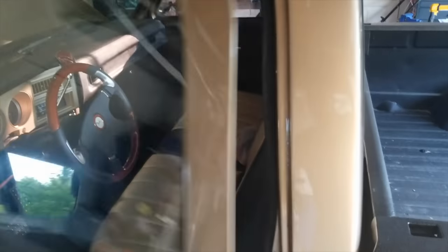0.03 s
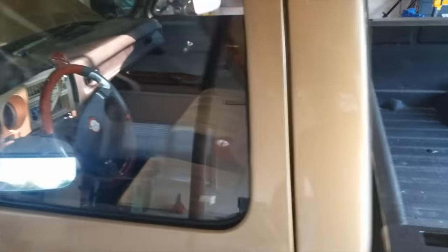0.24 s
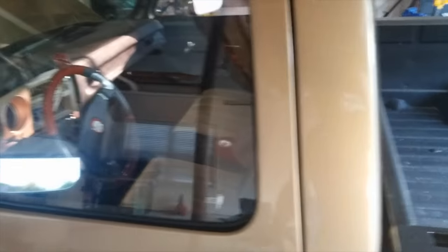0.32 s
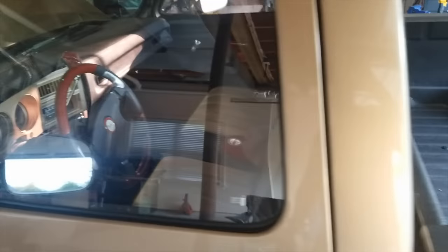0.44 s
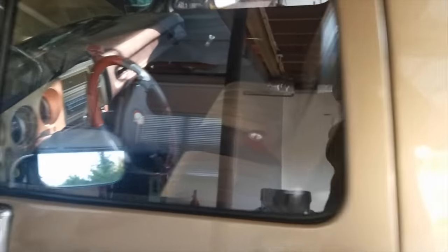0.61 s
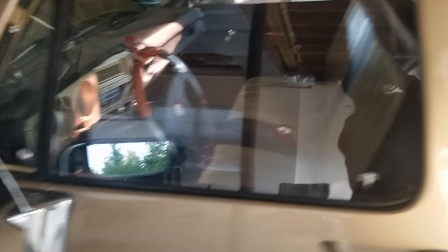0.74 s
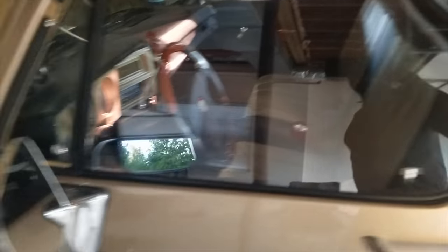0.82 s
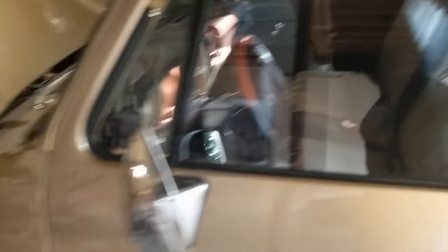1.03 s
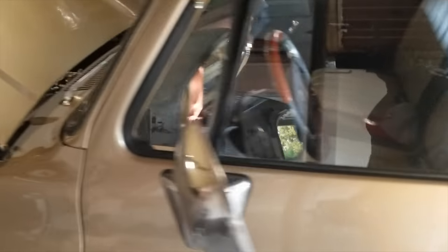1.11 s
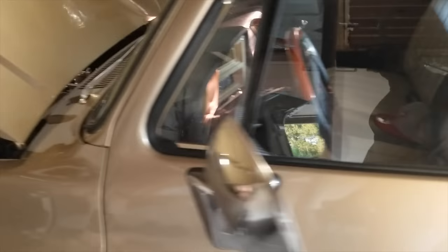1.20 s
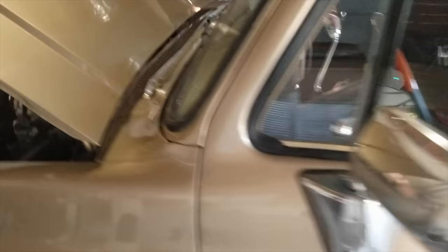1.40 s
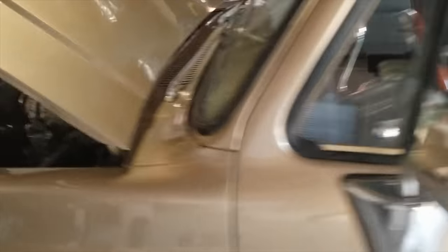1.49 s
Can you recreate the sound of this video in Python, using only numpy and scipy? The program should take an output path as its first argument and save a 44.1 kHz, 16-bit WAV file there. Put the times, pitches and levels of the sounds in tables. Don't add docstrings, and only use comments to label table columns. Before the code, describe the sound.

A pickup truck door slams shut once, close by, with a metallic latch clack and rattling glass.

```python
import sys
import numpy as np
from scipy import signal
from scipy.fft import rfft, irfft, next_fast_len
from scipy.io import wavfile
from scipy.ndimage import map_coordinates

SR = 44100
rng = np.random.default_rng(int(sys.argv[2]) if len(sys.argv) > 2 else 0)


def linear_from_db(decibels):
    return 10 ** (np.asarray(decibels, float) / 20)


def digitize_waveform(pressure):
    field = np.atleast_2d(pressure).T
    bounded = np.clip(field, -1, 1)
    quanta = np.round(bounded * 32767).astype(np.int16)
    wavfile.write(sys.argv[1], SR, quanta)


N = 68355
T = np.arange(N) / SR

# start_s, level_db, right_over_left_db
LATCH_KNOCKS = [(0.1953, -29.5, 12.5), (0.2053, -26, 2), (0.2158, -16, -1.5), (0.2248, -17, 7),
                (0.2261, -1.5, 9), (0.2286, -11, 5), (0.2312, -12.5, 7.5), (0.236, -12.5, 1.5),
                (.2420, -14.5, 3), (0.2456, -12, 2.5), (0.2497, -14, 3), (.2530, -13.5, 5),
                (0.259, -32.5, -5), (0.263, -17, 4), (0.289, -23.5, 1.5), (.3000, -25, 1.5),
                (0.313, -27.5, -2), (0.333, -43, 4)]
# pitch_hz, level_db, t60_s
LATCH_MODES = [(752, -12, 0.046), (955, 0.5, 0.019), (1126, 3.5, 0.022), (1221, 2, 0.016),
               (1310, 2.5, 0.013), (1472, -9, 0.071), (1720, 3.5, 0.018), (1884, -10, 0.04),
               (2167, -9, .02)]
# start_s, level_db, t60_s, right_over_left_db
TRIM_RATTLES = [(0.194, -38, 0.9, 2), (0.227, -29, .06, 13), (0.23, -19.5, 0.2, -4.5),
                (0.249, -21, 0.11, 2), (0.261, -21, 0.11, 0.5), (0.28, -25.5, 0.24, 0),
                (.2960, -23.5, 0.15, -4), (0.31, -42, 0.083, -3.5), (0.344, -46, 0.16, 0),
                (0.399, -56, 0.76, -2.5), (0.533, -51, 0.027, 0)]
# freq_hz, level_db_per_hz
TRIM_SPECTRUM = [(240, -41), (400, -8), (949, -2), (2250, -6), (4110, -9.5), (4950, -11), (7060, -12.5),
                 (12500, -16.5), (16000, -14.5)]
# start_s, level_db, t60_s, right_over_left_db
GLASS_SHAKES = [(0.1941, -33, 0.037, -1), (0.217, -62, 0.025, 3), (0.2315, -25, 0.03, 13),
                (0.2444, -17.5, .06, 12.5), (.2497, -19, 0.038, 1), (0.27, -19.5, 0.13, 5),
                (0.2809, -22.5, 0.086, 3), (0.488, -59.5, 0.027, 3.5), (0.509, -50.5, 0.0265, 2.5),
                (0.534, -62, 0.02, -0.5), (.588, -62, 0.012, 0)]
# freq_hz, level_db_per_hz
GLASS_SPECTRUM = [(2500, -30), (5000, -14), (7500, 0), (12500, -9), (16000, -2)]
# start_s, level_db, pitch_hz, t60_s
CAB_PUSHES = [(0.197, -31, 383, 0.098), (0.214, -26.5, 250.3, 0.18), (.243, -19, 1150, .07),
              (.248, -17.5, 44.94, 0.14), (.249, -19, 1090, .07), (.2800, -22.5, 148.8, 0.28),
              (0.2807, -22, 255, 0.1), (.283, -22, 97.8, 0.42), (0.288, -14, 50.2, 0.21),
              (.295, -26.5, 554.5, 0.15), (.296, -27.5, 1106, 0.16), (.3, -31, 797, 0.15),
              (0.311, -27, 1180, 0.095), (.325, -31.5, 699, 0.13), (0.305, -22.5, 210.8, 0.19),
              (.308, -29.5, 330, 0.12), (0.367, -26, 57.3, 0.3), (.34, -33, 344.5, .25),
              (0.386, -32, 256.6, 0.094), (.42, -39, 279.2, 0.12), (.395, -35.5, 148.3, .2),
              (0.407, -35, 94, 0.18), (0.518, -35, 102, 0.24)]
# start_s, level_db, rise_s, t60_s
SKIN_SHUDDERS = [
    (0.092, -37.5, 0.0014, 0.37),
    (0.192, -28, 0.0037, 0.25),
    (0.224, -32.5, .003, 0.3),
    (.28, -25.5, 0.005, 0.35),
    (0.318, -35, 0.0091, 0.4),
    (0.469, -40, 0.015, 0.2),
]
# freq_hz, level_db_per_hz
SKIN_SPECTRUM = [(40, -30.5), (90, -12.5), (150, -6.5), (260, -3.5), (380, -4.5), (550, -8.5), (800, -9),
                 (1300, -42.5)]
# freq_hz, t60_s
WALL_DECAY = [(100, .7), (500, .55), (1200, .52), (4000, .48), (9000, .33), (15000, .22)]
# start_s, level_db, rise_s, t60_s, right_over_left_db
SHOE_SCUFFS = [
    (0.0944, -48, 0.00056, 0.13, 4.5),
    (.11, -59, 0.0094, .25, 6),
    (1.352, -52, 0.042, 0.45, 2.5),
    (1.469, -56, 0.0031, 0.34, 3.5),
    (1.512, -56.5, 0.0052, 0.29, -1),
]
# freq_hz, level_db_per_hz
SOLE_SPECTRUM = [(400, -18.5), (700, -14.5), (1800, -2.5), (3000, -7.5), (6000, -16.5), (9500, -8.5),
                 (12500, -11), (16000, -23)]
# start_s, level_db, centre_hz, t60_s
DULL_TAPS = [(.532, -54, 1200, .08), (.58, -62, 1900, .1), (.845, -57, 2450, .05), (1.011, -63, 1350, .08),
             (1.012, -65, 1950, .08), (1.39, -61, 1900, .2), (1.511, -50, 1500, .03),
             (1.521, -55, 1600, .1), (1.525, -66, 5200, .15)]
# start_s, level_db, lowest_hz, left_over_right_db
GRIT_TICKS = [
    (1.4674, -28, 9000, 5),
    (1.4686, -38, 6000, 5),
    (1.5073, -31, 5000, 3),
]
# (pitch_hz, level_db, t60_s)
RINGING_STONES = [
    (1.4674, -38, [(6640, -6, .008), (8130, -1, .009), (11100, 0, .005), (12500, -3, .004), (14200, -7, .004)]),
    (1.5073, -40, [(2250, -2, .009), (2640, -4, .006), (3900, -2, .007), (6800, 1, .005), (7970, 1, .005), (13500, -6, .004)]),
]
# freq_hz, level_db_per_hz
TRAFFIC_SPECTRUM = [(15, -66.5), (25, -19.5), (124, -1), (164, -6.5), (386, -14.5), (433, -19),
                    (469, -20.5), (827, -30), (1200, -56), (1560, -65), (2640, -120)]
# freq_hz, level_db_per_hz
AIR_SPECTRUM = [(500, -30), (900, 0), (1800, -6), (2800, -15), (4300, -23), (6300, -22), (8000, -18),
                (10400, -45)]
# freq_hz, level_db_per_hz
INSECT_SPECTRUM = [(8000, -19), (8600, -12), (9100, -8.5), (9500, -3), (9800, -6.5), (10100, -15.5),
                   (10500, -30)]
# freq_hz, level_db_per_hz
HISS_SPECTRUM = [(6500, -36), (8500, -2), (16000, 1.5)]
# freq_hz, likeness (-1 to 1)
YARD_ALIKE = [(60, 0.91), (180, 0.94), (550, 0.0027), (1650, 0.62), (4970, -0.02), (15000, -0.92)]
# time_s, gain_db
RECORDER_GAIN = [(0, 12), (0.202, 11.5), (.23, 20), (0.501, 5.5), (.7, 4), (1.101, 2.5), (1.351, 3.5),
                 (1.55, 8.5)]
# freq_hz, likeness (-1 to 1)
SKIN_ALIKE = [(60, 1.0), (250, 0.99), (900, 0.38)]
TRIM_ALIKE = [(500, 0.94), (3000, 0.081), (12000, 0.3)]
SOLE_ALIKE = [(800, 0.53), (5000, 0.17)]
GLASS_ALIKE, TAP_ALIKE = [(8000, 0.35)], [(900, 0.7)]
INSECT_ALIKE, HISS_ALIKE = [(9000, 0.062)], [(9000, 0.0024)]


def unit(x):
    return x / np.sqrt(np.mean(x ** 2) + 1e-20)


def along(points, hz):
    f, v = np.transpose(points)
    return np.interp(np.log(hz + 1), np.log(f + 1), v)


def filtered(x, response):
    m = next_fast_len(N + SR // 2)
    return irfft(rfft(x, m) * response(np.fft.rfftfreq(m, 1 / SR)), m)[..., :N]


def wobble(rate_hz):
    return map_coordinates(rng.standard_normal(200), [T * rate_hz])


def rush(spectrum, alike):
    def response(hz):
        angle = np.arccos(np.clip(along(alike, hz), -1, 1)) / 2
        return linear_from_db(along(spectrum, hz)) * [np.cos(angle), np.sin(angle)]

    mid, side = filtered(rng.standard_normal((2, N)), response)
    return unit(np.array([mid + side, mid - side]))


def burst(start_s, rise_s, t60_s):
    t = np.maximum(T - start_s, 0)
    return (1 - np.exp(-t / max(rise_s, 1e-5))) * linear_from_db(-60 * t / max(t60_s, 1e-3))


def sides(right_db):
    return linear_from_db([[-right_db / 2], [right_db / 2]])


def ring(start_s, modes, rise_s, scatter_db, turn):
    hz, db, t60_s = np.transpose(modes)[:, :, None]
    first = int(start_s * SR)
    t = np.maximum(T - start_s, 0)[first:int((start_s + 0.5) * SR)]
    level_luck, phase_luck = rng.standard_normal((2, len(modes), 1))
    decay = linear_from_db(db + scatter_db * level_luck - 60 * t / t60_s)
    out = np.zeros((2, N))
    for side in (0, 1):
        phase = turn * (2 * side - 1) * phase_luck * np.clip(hz / 1200, 0, 1)
        wave = decay * np.sin(2 * np.pi * hz * t + phase)
        out[side, first:first + len(t)] = wave.sum(0) * (1 - np.exp(-t / rise_s))
    return out


def latch():
    out = np.zeros((2, N))
    for s, db, right in LATCH_KNOCKS:
        knock = ring(s, LATCH_MODES, rise_s=0.0016, scatter_db=2.5, turn=0.1)
        out += linear_from_db(db - 4.5) * sides(right) * knock
    return out


def rattle():
    trim = sum(linear_from_db(db) * sides(right) * burst(s, 0.001, t60) for s, db, t60, right in TRIM_RATTLES)
    glass = sum(linear_from_db(db) * sides(right) * burst(s, 0.0005, t60) for s, db, t60, right in GLASS_SHAKES)
    clumps = linear_from_db(2.5 * map_coordinates(rng.standard_normal(N // 40 + 4), [np.arange(N) / 40]))
    trim = trim * rush(TRIM_SPECTRUM, TRIM_ALIKE)
    glass = glass * rush(GLASS_SPECTRUM, GLASS_ALIKE)
    return clumps * (trim + glass)


def cab():
    boom = np.zeros((2, N))
    for s, db, hz, t60 in CAB_PUSHES:
        boom -= ring(s, [(hz, db, t60)], rise_s=0.12 / hz, scatter_db=1.5, turn=0.1)
    shudder = sum(linear_from_db(db) * burst(s, rise, t60) for s, db, rise, t60 in SKIN_SHUDDERS)
    return boom + shudder * sides(1.2) * rush(SKIN_SPECTRUM, SKIN_ALIKE)


def wall(x):
    delay_s = 0.011
    hz, t, z = signal.stft(rng.standard_normal((2, SR // 2)), SR, nperseg=256)
    decay = linear_from_db(-60 * t / along(WALL_DECAY, hz)[:, None])
    tail = signal.istft(z * decay, SR, nperseg=256)[1]
    tail = np.pad(tail, ((0, 0), (0, N)))
    mid, side = filtered(tail, lambda hz: [1 + 0 * hz, np.clip((hz / 1200) ** 1.8, 0, 1)])
    tail = np.array([mid + side, mid - side])
    late = np.pad(x, ((0, 0), (int(delay_s * SR), 0)))
    return signal.fftconvolve(late, tail / np.linalg.norm(tail[0]), axes=1)[:, :N]


def shoe():
    scuffs = sum(linear_from_db(db) * sides(right) * burst(s, rise, t60) for s, db, rise, t60, right in SHOE_SCUFFS)
    out = scuffs * linear_from_db(2.1 * wobble(110)) * rush(SOLE_SPECTRUM, SOLE_ALIKE)
    for s, db, hz, t60 in DULL_TAPS:
        hump = [(hz / 2.5, -30), (hz / 1.2, -4), (hz, 0), (hz * 1.2, -4), (hz * 2, -30)]
        out = out + linear_from_db(db) * burst(s, 0.001, t60) * rush(hump, TAP_ALIKE)
    for s, db, hz, left in GRIT_TICKS:
        grit = burst(s, 0.0001, 0.003) * rng.standard_normal(N)
        grit = signal.sosfilt(signal.butter(3, hz, "high", fs=SR, output="sos"), grit)
        out = out + linear_from_db(db) * sides(-left) * grit / np.abs(grit).max()
    for s, db, modes in RINGING_STONES:
        out = out + linear_from_db(db) * sides(-4) * ring(s, modes, rise_s=0.0001, scatter_db=0, turn=0.1)
    return out


def yard():
    time_s, gain_db = np.transpose(RECORDER_GAIN)
    traffic = linear_from_db(-52.5 + 1.2 * wobble(11)) * rush(TRAFFIC_SPECTRUM, YARD_ALIKE)
    air = linear_from_db(-71.5 + 2.1 * wobble(1.7)) * rush(AIR_SPECTRUM, YARD_ALIKE)
    flutter_db = 0.58 * np.sin(2 * np.pi * 76 * T)
    insects = linear_from_db(-71.5 + 1.1 * wobble(5.8) + flutter_db) * rush(INSECT_SPECTRUM, INSECT_ALIKE)
    hiss = linear_from_db(-79.5) * rush(HISS_SPECTRUM, HISS_ALIKE)
    return linear_from_db(np.interp(T, time_s, gain_db)) * (traffic + air + insects + hiss)


def scene():
    bright, low = latch() + rattle(), cab()
    to_wall = bright + linear_from_db(-3.0) * low.mean(0)
    return bright + low + linear_from_db(-11.5) * wall(to_wall) + shoe() + yard()


def roll_off(x):
    return signal.sosfilt(signal.butter(12, 16730, fs=SR, output="sos"), x)


def record(dry):
    ceiling, bass_hz, top_hz, above_db = 0.93, 25, 15800, -42
    held = dry / (1 + np.abs(dry / ceiling) ** 8) ** (1 / 8)

    def response(hz):
        treble = linear_from_db(above_db * np.clip((hz - top_hz) / 200, 0, 1))
        return treble * hz ** 2 / (hz ** 2 + bass_hz ** 2)

    mix = filtered(held, response)
    return roll_off(mix)


dry = scene()
out = record(dry)
digitize_waveform(out)
```